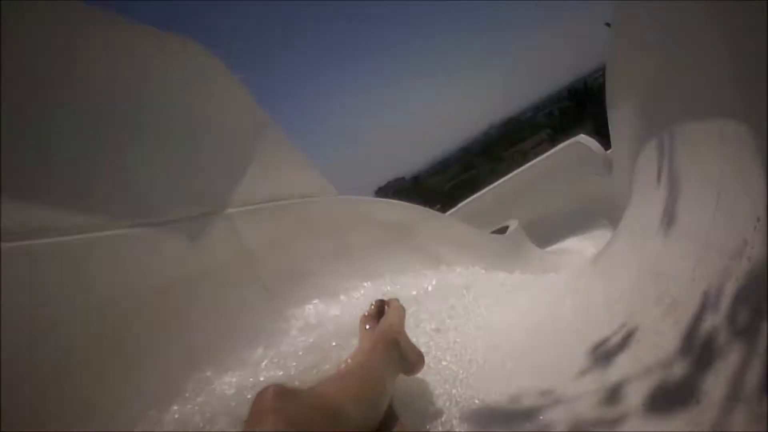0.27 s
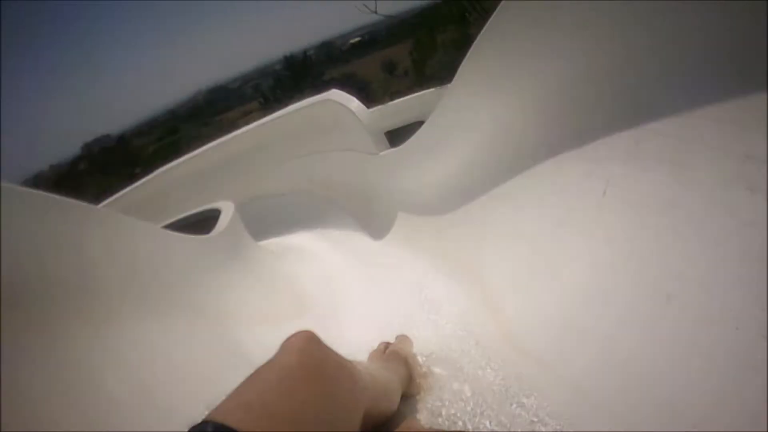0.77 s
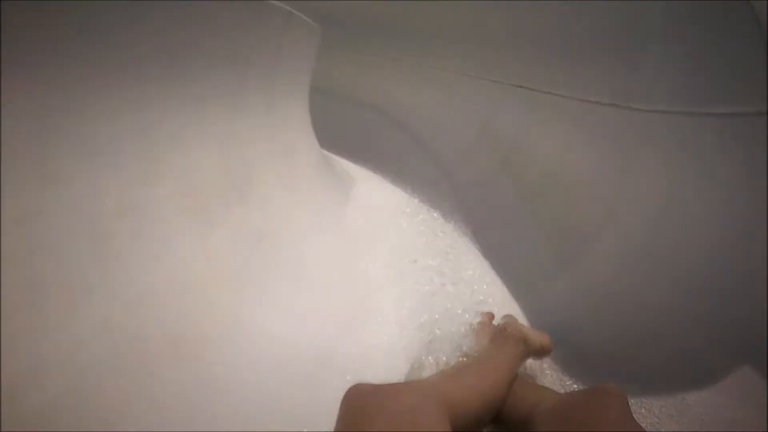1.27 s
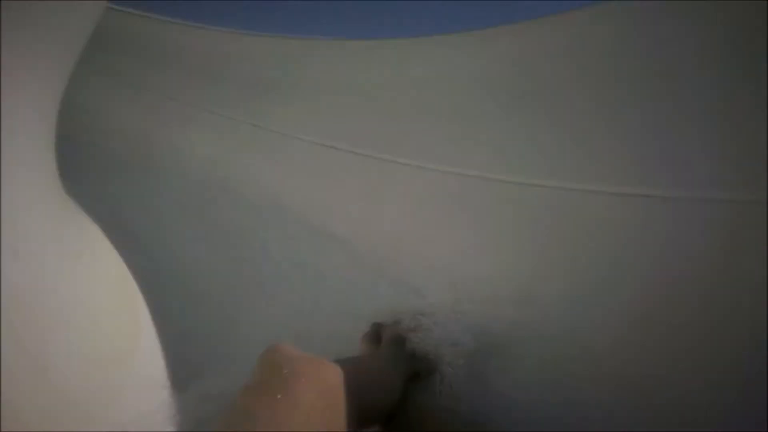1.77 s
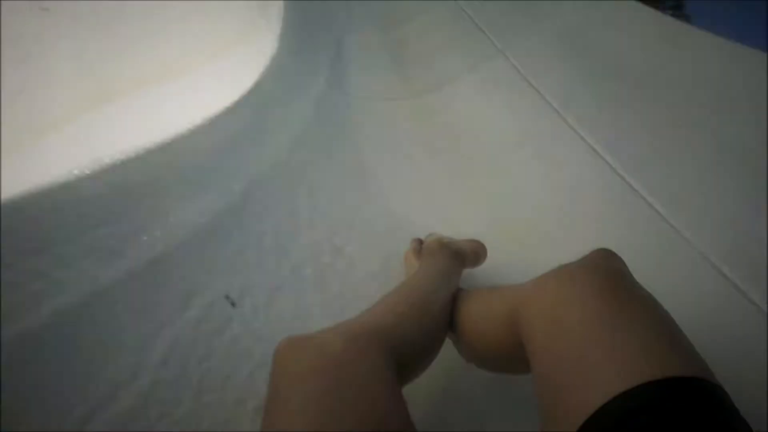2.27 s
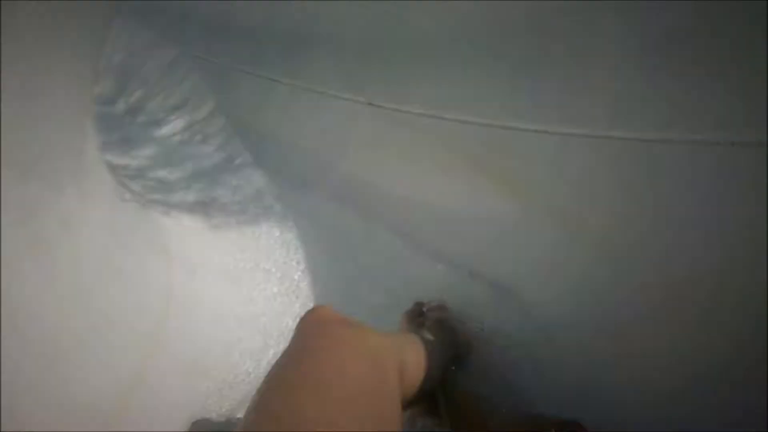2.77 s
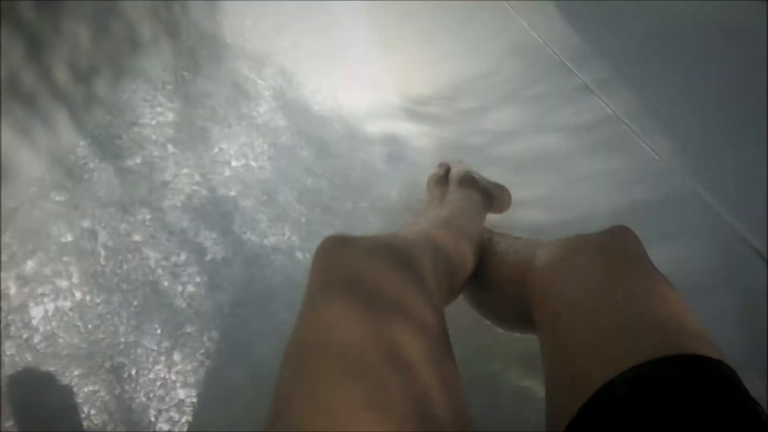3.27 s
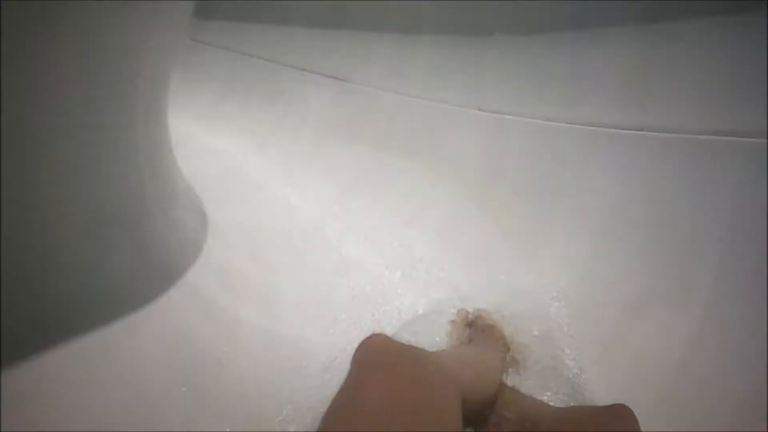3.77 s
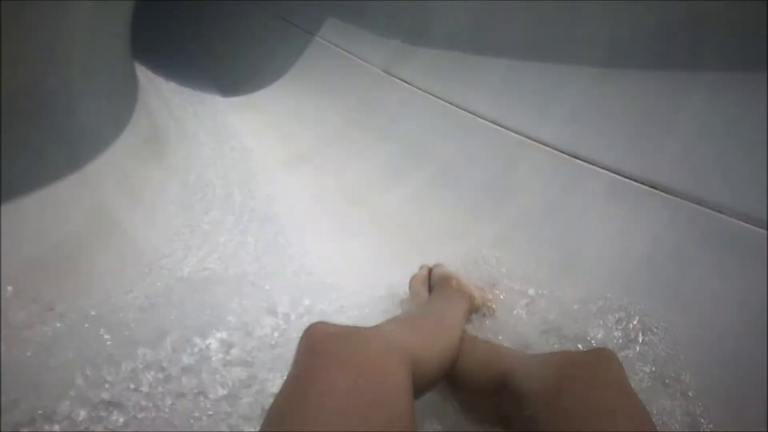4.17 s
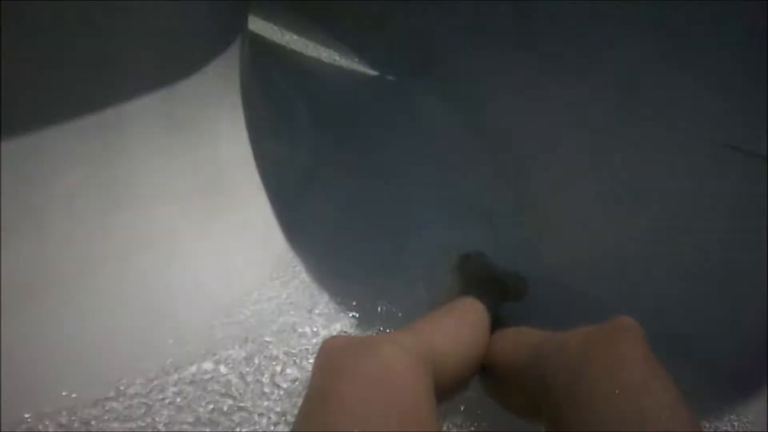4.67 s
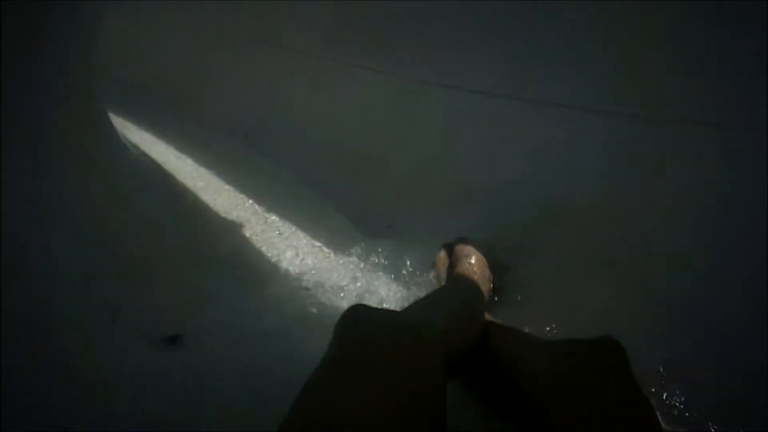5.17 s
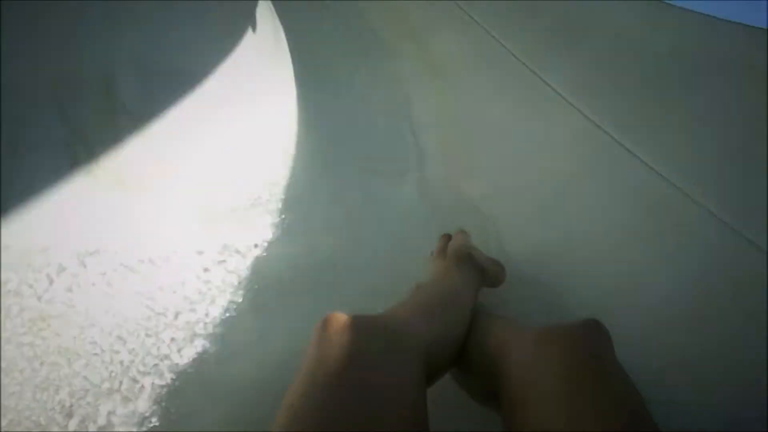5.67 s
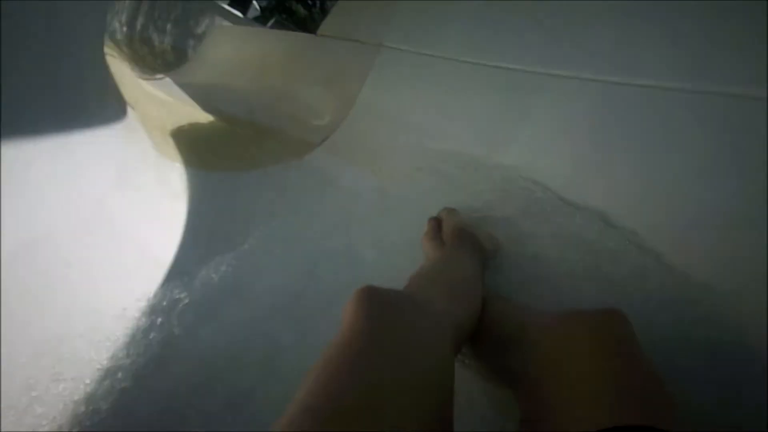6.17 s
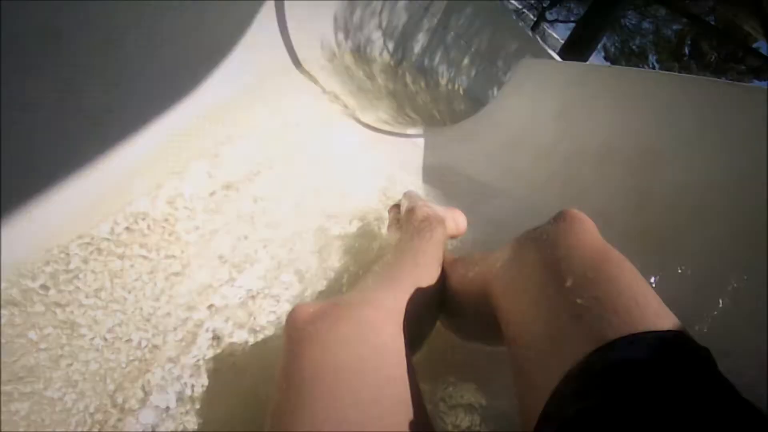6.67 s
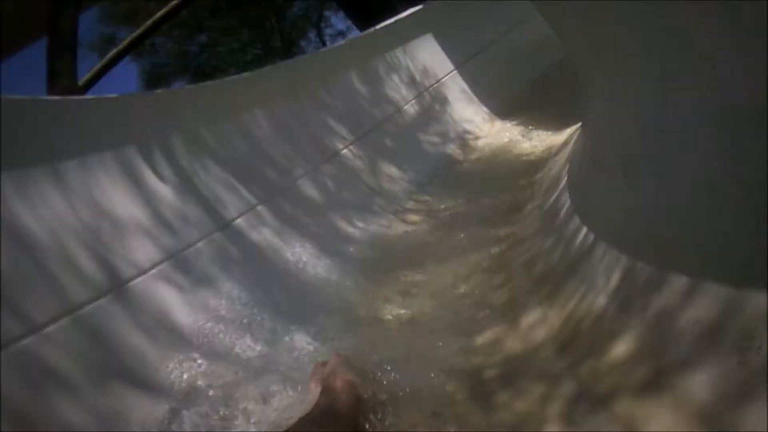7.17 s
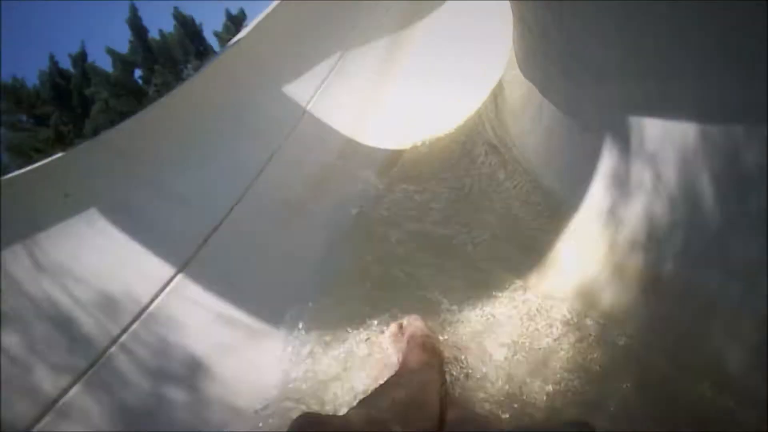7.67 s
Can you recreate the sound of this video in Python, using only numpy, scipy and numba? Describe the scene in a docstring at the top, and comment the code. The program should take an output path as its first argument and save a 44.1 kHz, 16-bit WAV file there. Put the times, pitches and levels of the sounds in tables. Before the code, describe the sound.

Riding down a plastic water slide: boomy bumps and rattling raps over dull bubbling water, heard from inside a small closed housing, left side only.

```python
"""Water slide from inside a sealed case

A small camera in a sealed case rides down a fibreglass water slide with its rider.
The case sways on its mount (deep rumble), knocks over panel joints and swings low, at times overloading the input.
These are swings, ringing blows and short pushes. Water rush, bubbles and spray are filtered noise and droplets,
muffled by the case and its cavity. One thin whistle is a wavering tone. Only the left channel sounds."""
import sys
import numpy as np
from scipy import signal
from scipy.fft import rfft, irfft, next_fast_len
from scipy.io import wavfile
from scipy.ndimage import uniform_filter1d
from numba import njit

SR = 44100
rng = np.random.default_rng(int(sys.argv[2]) if len(sys.argv) > 2 else 0)


def log_audio(samples):
    """Write samples as a 16-bit WAV file to the path given in sys.argv[1]."""
    # one column per channel
    frames = np.atleast_2d(samples).T
    # limit to full scale, then quantise
    limited = np.clip(frames, -1, 1)
    pcm = np.round(limited * 32767).astype(np.int16)
    wavfile.write(sys.argv[1], SR, pcm)


N = 349713

# All table levels are relative, before the mixing offsets and the input gain.
# Water round the rider: t/s, rush level/dB, spray level/dB
WATER_LEVELS = [(0.0, -48, -76), (0.33, -49.5, -81), (0.93, -49.5, -79.5), (1.15, -50, -76.5),
                (1.48, -45, -76.5), (1.66, -45.5, -75), (2.38, -47.5, -79), (2.5, -43, -68.5),
                (2.69, -42, -75), (2.87, -43, -72.5), (3.13, -50.5, -79), (3.42, -52, -78),
                (3.58, -39.5, -74), (3.73, -42.5, -73.5), (3.84, -42.5, -73), (4.26, -48.5, -77.5),
                (4.55, -49.5, -77), (4.63, -44, -76), (4.82, -44.5, -74), (4.88, -47, -77.5),
                (5.25, -49, -77.5), (5.6, -50.5, -80.5), (5.7, -46.5, -77), (5.87, -45, -76),
                (6.2, -50, -79), (6.45, -48, -77), (6.68, -49, -79), (6.88, -44.5, -75), (7.09, -45, -75.5),
                (7.62, -49.5, -77), (7.93, -46, -76)]
# What the wall and cavity of the case let through of the rush: f/Hz, level/dB
CASE_MUFFLING = [(120, -9), (200, -3.5), (324, -15), (473, -8), (565, -10.5), (750, -10), (1010, -9.5),
                 (1250, -5.5), (1470, 1), (1650, -2), (2060, -17.5), (2270, -13.5), (2620, -21),
                 (2980, -19), (3500, -28), (4000, -45), (4600, -50.5)]
# High cavity peaks that colour the spray: f/Hz, width/Hz, level/dB
SPRAY_PEAKS = [(5020, 710, -5), (6860, 1700, 0.5), (3934, 700, -4.5)]
# How loosely the case rocks between bumps: t/s, level/dB
SWAY_LEVELS = [(0.0, -27), (0.49, -29), (0.64, -26), (0.9, -30.5), (1.2, -25.5), (1.72, -25.5),
               (2.63, -27.5), (2.92, -21.5), (3.18, -32), (3.58, -26), (3.89, -28), (4.35, -35),
               (4.59, -29.5), (4.99, -31), (5.5, -36), (5.7, -30), (5.94, -28.5), (6.76, -25.5),
               (6.87, -29.5), (7.93, -29.5)]
# Knocks: t/s, thud through the mount level/dB, rap on the wall level/dB, cavity ring level/dB
KNOCK_EVENTS = [(0.102, -28, -42, -58), (0.298, -20, -36.5, -36), (0.399, -18, -40, -45),
                (0.476, -21, -65, -48), (0.6, -19, -26, -22.5), (0.699, -11, -27.5, -23),
                (0.729, -21.5, -22.5, -38), (0.835, -17.5, -22.5, -39), (0.873, -10, -29, -23),
                (0.929, -29, -28.5, -33.5), (0.985, -32, -34, -46), (1.021, -22, -28, -31.5),
                (1.066, -23.5, -48, -49), (1.117, -24, -27, -35), (1.164, -25, -39, -44),
                (1.229, -16.5, -32.5, -27.5), (1.297, -22, -40, -47), (1.337, -24.5, -37, -32),
                (1.401, -18, -31, -32), (1.664, -54, -33, -32), (1.876, -16, -57, -44),
                (1.947, -28, -27.5, -33), (2.076, -13.5, -33, -21.5), (2.261, -28.5, -16.5, -20.5),
                (2.294, -16.5, -41, -38), (2.333, -34, -27, -34), (2.378, -25, -36, -45),
                (2.433, -14.5, -51, -43.5), (2.521, -14.5, -26, -21.5), (2.576, -25, -31.5, -48),
                (2.653, -28.5, -35.5, -45), (2.875, -29, -46, -34), (2.91, -31, -61, -39),
                (2.951, -27.5, -46, -41), (3.131, -22, -26.5, -26), (3.178, -21, -41, -45),
                (3.267, -24, -53, -51), (3.369, -9.5, -33, -24), (3.387, -42, -31, -45),
                (3.431, -30, -30, -34), (3.591, -13.5, -56, -29), (3.708, -24.5, -56, -40),
                (3.911, -22.5, -35, -33), (4.097, -15.5, -32.5, -26), (4.139, -23.5, -42, -31),
                (4.204, -24.5, -24, -23), (4.61, -19.5, -43, -44), (4.708, -29, -30, -46),
                (4.762, -26, -65, -50), (5.203, -30, -27.5, -32), (5.35, -18.5, -32.5, -28.5),
                (5.451, -23.5, -46, -51), (5.543, -25.5, -55, -52), (5.733, -25.5, -55, -38),
                (5.922, -22, -47, -47), (6.002, -27, -42, -50), (6.075, -25, -30, -32.5),
                (6.108, -21, -35.5, -32.5), (6.303, -19.5, -54, -26.5), (6.366, -24, -56, -54),
                (6.5296, -35, -40, -27), (6.537, 1, -14, -27), (6.649, -16, -40, -30),
                (6.7, -21.5, -38, -38), (6.943, -26.5, -28.5, -37), (7.033, -23.5, -31.5, -47),
                (7.155, -23, -32.5, -30), (7.311, -10.5, -32.5, -19), (7.535, -12.5, -35, -29),
                (7.674, -20.5, -25, -23), (7.703, -20.5, -39, -29), (7.765, -24, -22.5, -23)]
# What a knock rings, one list each for mount, body, wall and cavity: f/Hz, level/dB, t60/s
CASE_MODES = [
    [(150, 2.5, 0.039), (171, -8.5, 0.016)],
    [(352, 0.5, 0.066), (447.3, 1.5, 0.048)],
    [(556, -9, 0.015), (730, 0, 0.02), (1010, -6, 0.013)],
    [(1490, 4, 0.011), (2100, -12.5, 0.012), (2990, -19.5, 0.012)],
]
# How long the push lasts for mount, body, wall and cavity: t/s
CONTACT_TIMES = [0.0022, 0.0011, 0.0012, 0.0012]
# Single drops that slap the case: t/s, level/dB
DROP_SLAPS = [(1.585, -41.5), (2.484, -42), (2.68, -44.5), (4.569, -47.5), (4.636, -39.5), (5.7034, -42),
              (7.1755, -34.5)]
# Overload clicks at two knocks: t/s, level/dB
OVERLOAD_CLICKS = [(0.6998, -28), (7.3133, -20.5)]
# Jolts and low swings of the case, hard to slight:
# t/s, level/dB, first swing f/Hz, last swing f/Hz, t60/s, direction of the first swing
JOLT_EVENTS = [(0.668, -3.5, 24.3, 34, 0.097, -1), (0.681, 3, 28.9, 6.4, 0.17, 1),
               (1.092, -10, 28, 30.6, 0.29, 1), (1.507, -4.5, 37, 12.4, 0.37, 1),
               (2.272, -9, 29, 52, 0.19, 1), (2.421, -7.5, 25.5, 46, 0.12, -1),
               (2.434, 1.5, 41, 40, 0.2, 1), (2.895, -2.5, 35.5, 41.5, 0.12, -1),
               (2.9104, 2.5, 41, 20, 0.14, 1), (3.378, -3, 38.5, 27, 0.28, 1), (3.59, 8, 201, 32, 0.17, 1),
               (5.214, -18, 29, 39, 0.22, 1), (6.023, -8, 37, 31.6, 0.69, 1), (6.074, 1, 33.5, 40, 0.15, 1),
               (6.496, -8, 35, 32, 0.24, 1), (6.531, 16.5, 95.3, 14.4, 0.11, -1),
               (6.634, -2.5, 15, 8.3, 0.14, 1), (7.245, -12, 11.3, 16.5, 0.25, -1),
               (7.317, -9.5, 39.2, 18, 0.14, 1), (7.676, -2, 38, 43, 0.12, -1)]

# Bubbles bursting against the wall: bursts per second in each stream, middle pitch, ring width, level against rush
BUBBLE_RATE, BUBBLE_HZ, BUBBLE_WIDTH_HZ, BUBBLE_DB = 150, 1478, 70, -3.5
# Above STEADY_HZ the rush follows only this share of the swells, counted in dB
STEADY_HZ, STEADY_SHARE = 2000, 0.83
# Whistle: start and end, middle pitch, middle level; then depth (share of the pitch) and speed of its waver
WHISTLE_S, WHISTLE_HZ, WHISTLE_DB = (7.5, 7.572), 7250, -58.5
WHISTLE_WAVER, WHISTLE_WAVER_HZ = 0.017, 28
SWAY_HZ = 27.6  # pitch that the loose swing wanders about
# Extra sway round each knock: level against the thud, time to rise before it and to fall after it
SHAKE_DB, SHAKE_RISE_S, SHAKE_FALL_S = -12.5, 0.01, 0.012
# How strongly thud and rap drive mount, body and wall, in dB
THUD_DB, RAP_DB = [0.5, -15, -33], [-12.5, -10, 1]
PUSH_S, PUSH_DB = 0.0017, 2  # short push of the wall as a rap begins, level against the rap
LEAN_S, LEAN_DB = 0.009, -6  # opposite press just before a thud, level against the thud
REBOUND_HZ, REBOUND_DB, REBOUND_T60_S = 37.7, -2.5, 0.12  # opposite swing of the mount, level against the thud
FAINT_COUNT, FAINT_DB, FAINT_SPREAD_DB = 8, -34.5, 3.5  # extra faint knocks at random times
CLICK_S = 0.00006  # time from the start of an overload click to its peak
GAIN_DB = 5.5  # gain ahead of the clipping
AIR_TOP_HZ, TOP_HZ = 7700, 16000  # top cut before and after the clipping


def amp(db):
    """Turn a level in dB into a gain."""
    return 10 ** (np.asarray(db) / 20)


def unit(x):
    """Scale a sound to an rms of 1."""
    return x / np.sqrt(np.mean(x ** 2))


def curves(table):
    """Draw straight lines through each column of a timed table, giving a value at every sample."""
    times, *columns = np.transpose(table)
    return [np.interp(np.arange(N) / SR, times, column) for column in columns]


@njit
def svf(x, hz, width):
    """Resonant band-pass filter with a moving centre, where its gain is 1."""
    y, band_state, low_state = np.empty(len(x)), 0., 0.
    for i in range(len(x)):
        g, damping = np.tan(np.pi * hz[i] / SR), width / hz[i]
        v = (band_state + g * (x[i] - low_state)) / (1 + g * (g + damping))
        band_state = 2 * v - band_state
        low_state = low_state + 2 * g * v
        y[i] = damping * v
    return y


def band(x, hz, width):
    """Make a steeper band by applying the same resonance twice."""
    centre = hz * np.ones(N)
    once = svf(x, centre, 1. * width)
    return svf(once, centre, 1. * width)


def walk(rate):
    """Random wandering with spread 1: values held for 1 / rate seconds, then smoothed twice."""
    hold = int(SR / rate)
    steps = np.repeat(rng.standard_normal(N // hold + 1), hold)
    smooth = uniform_filter1d(uniform_filter1d(steps, hold), hold)
    return unit(smooth[:N])


def colour(x, points):
    """Shape a sound by (Hz, dB) points joined on a log-frequency axis, almost silent outside them."""
    size = next_fast_len(N)
    hz, db = np.transpose(points)
    bin_hz = np.arange(1, size // 2 + 2) * SR / size
    gain_db = np.interp(np.log(bin_hz), np.log(hz), db, left=-90, right=-90)
    return irfft(rfft(x, size) * amp(gain_db), size)[:N]


def add(out, s, sound):
    """Mix a sound in, starting at s seconds."""
    i = max(int(s * SR), 0)
    out[i:i + len(sound)] += sound[:N - i]


def bumps(times, levels_db, rise_s, fall_s):
    """Envelope that climbs to each event and falls away after it; overlaps add as energy."""
    grid = np.arange(0, N, 64)
    t = grid / SR - np.array(times)[:, None]
    hump = amp(levels_db)[:, None] * np.exp(-np.abs(t) / np.where(t < 0, rise_s, fall_s))
    return np.interp(np.arange(N), grid, np.sqrt(np.sum(hump ** 2, axis=0)))


def droplets(rate, spread_db):
    """Random one-sample impacts of very uneven size, on average rate per second."""
    hit = rng.random(N) < rate / SR
    size_db = spread_db * np.minimum(rng.exponential(size=N), 4)
    return hit * rng.standard_normal(N) * amp(size_db)


def bubbles():
    """Three streams of bursts, each ringing a narrow resonance whose pitch keeps sliding."""
    streams = 0
    for _ in range(3):
        bursts = droplets(BUBBLE_RATE, 2.2)
        pitch = BUBBLE_HZ * np.exp(.14 * walk(40))
        streams = streams + svf(bursts, pitch, BUBBLE_WIDTH_HZ + 0.)
    return unit(streams)


def water():
    """Rush made of burbling noise bands, droplets and bubbles, plus thin spray in the high cavity peaks."""
    rush_db, spray_db = curves(WATER_LEVELS)
    surge, rush = walk(12), 0  # all bands surge together
    for hz in 130 * 2 ** np.arange(0, 5.2, 1 / 3):  # three bands per octave
        source = rng.standard_normal(N) + .5 * unit(droplets(500, 4.1))
        steady_db = (hz > STEADY_HZ) * (STEADY_SHARE - 1) * (rush_db - rush_db.mean())
        burble_db = 1.34 * surge + 2.0 * walk(40)
        rush = rush + amp(steady_db + burble_db) * svf(source, hz * np.ones(N), 0.33 * hz)
    muffled_bubbles = unit(colour(bubbles(), CASE_MUFFLING))
    rush = unit(colour(rush, CASE_MUFFLING)) + amp(BUBBLE_DB + 2.5 * walk(14)) * muffled_bubbles
    patter = rng.standard_normal(N) + 0.72 * unit(droplets(460, 2.3))
    spray = sum(amp(db + 2.3 * walk(40)) * unit(band(patter, hz, width)) for hz, width, db in SPRAY_PEAKS)
    return amp(rush_db + 1.0) * rush + amp(spray_db + 0.5 + 2.2 * walk(35)) * spray


def whistle():
    """One short, thin, high tone whose pitch wavers regularly and whose pitch and level also wander."""
    t = np.arange(N) / SR
    outside_s = np.abs(t - np.clip(t, *WHISTLE_S))
    db = WHISTLE_DB - 3000 * outside_s  # fades by 3 dB per millisecond at either end
    waver = WHISTLE_WAVER * np.cos(2 * np.pi * WHISTLE_WAVER_HZ * (t - WHISTLE_S[0]))
    hz = WHISTLE_HZ * (1 + waver) * (1 + 0.0046 * walk(200))
    return amp(db + 2.0 * walk(150)) * np.sin(2 * np.pi * np.cumsum(hz) / SR)


def sway():
    """The case rocks on its mount in lumps: a loose swing of wandering pitch, slow heaving, faster flutter."""
    rest_db = curves(SWAY_LEVELS)[0]
    knock_s, thud_db = np.transpose(KNOCK_EVENTS)[:2]
    shake = bumps(knock_s, SHAKE_DB + thud_db, SHAKE_RISE_S, SHAKE_FALL_S)
    size = np.hypot(amp(rest_db), shake)
    swing_hz = SWAY_HZ * np.exp(.42 * walk(30))
    swing = np.sqrt(2) * np.sin(2 * np.pi * np.cumsum(swing_hz) / SR)
    heave = unit(band(rng.standard_normal(N), 16.2, 27.5))
    flutter = amp(2.2 * walk(24)) * unit(band(rng.standard_normal(N), 70, 42))
    lumps = amp(4.0 + 2.98 * np.tanh(walk(24)))
    rocking = size * lumps * (0.44 * swing + 0.71 * heave)
    return rocking + size ** 1.1 * amp(-28.5) * flutter


def ring(modes, chance, contact_s):
    """One soft blow on a set of modes; chance shifts each pitch and strength, and the decay of the whole set."""
    t = np.arange(SR // 8) / SR
    decay_factor = np.exp(0.21 * chance[-1])
    tone = 0
    for (hz, db, t60), c in zip(modes, chance):
        fade = np.exp(-np.log(1000) * t / t60 * decay_factor)
        tone = tone + amp(db + 1.1 * c) * np.sin(2 * np.pi * hz * (1 + 0.035 * c) * t) * fade
    return tone * np.sin(np.pi / 2 * np.minimum(t / contact_s, 1)) ** 2


def knocks():
    """Knocks ring mount, body, wall and cavity against an opposite swing; drops ring the cavity; overload clicks."""
    out = np.zeros(N)
    faint = []
    for u, (a, b) in zip(rng.random(FAINT_COUNT), rng.standard_normal((FAINT_COUNT, 2))):
        thud_db = FAINT_DB + FAINT_SPREAD_DB * a
        rap_db = FAINT_DB - 17 + FAINT_SPREAD_DB * b
        faint.append((u * N / SR, thud_db, rap_db, FAINT_DB - 15.5))
    chance = rng.standard_normal((len(KNOCK_EVENTS) + FAINT_COUNT, 4, 3))
    for (s, thud_db, rap_db, cavity_db), c in zip(faint + KNOCK_EVENTS, chance):
        solid_drive = np.hypot(amp(thud_db) * amp(THUD_DB), amp(rap_db) * amp(RAP_DB))
        drive = [*solid_drive, amp(cavity_db)]
        blow = sum(g * ring(*part) for g, *part in zip(drive, CASE_MODES, c, CONTACT_TIMES))
        rebound = ring([(REBOUND_HZ, thud_db + REBOUND_DB, REBOUND_T60_S)], c[0, 2:], 0.013)
        add(out, s - .001, amp(1.5) * blow - rebound)
        add(out, s, amp(rap_db + PUSH_DB) * np.hanning(int(PUSH_S * SR)))
        add(out, s - LEAN_S, -amp(thud_db + LEAN_DB) * np.hanning(int(LEAN_S * SR)))
    for (s, db), c in zip(DROP_SLAPS, rng.standard_normal((len(DROP_SLAPS), 3))):
        add(out, s, amp(db + 11.5) * ring([(1394, 3.4, 0.029), (1538, 3.5, 0.022)], c, 0.0012))
    t = np.arange(SR // 100) / SR
    for s, db in OVERLOAD_CLICKS:
        add(out, s, -amp(db) * t / CLICK_S * np.exp(-t / CLICK_S))
    return out


def jolts():
    """The mount swings, hard or gently, its pitch gliding from first towards last as it dies."""
    out, t = np.zeros(N), np.arange(SR // 2) / SR
    for s, db, first_hz, last_hz, t60, way in JOLT_EVENTS:
        pitch = last_hz + (first_hz - last_hz) * np.exp(-t * first_hz / 1.25)
        attack = (1 - np.exp(-t / 0.0035)) ** 2
        fade = np.exp(-np.log(1000) * t / t60)
        swing = np.sin(2 * np.pi * np.cumsum(pitch) / SR)
        add(out, s, np.sign(way) * amp(db) * attack * fade * swing)
    return out


def scene():
    """Everything reaches the single microphone on the left; the right channel is silent."""
    left = water() + whistle() + sway() + knocks() + jolts()
    return np.array([left, np.zeros(N)])


def record(dry):
    """Narrow-band microphone, an input stage that clips flat, then a last top cut."""
    mic_filter = signal.ellip(8, .2, 60, AIR_TOP_HZ, fs=SR, output="sos")
    mic = signal.sosfilt(mic_filter, amp(GAIN_DB) * dry)
    clipped = np.clip(mic, -1, 1)
    return signal.sosfilt(signal.butter(8, TOP_HZ, fs=SR, output="sos"), clipped)


dry = scene()
out = record(dry)
log_audio(out)
```